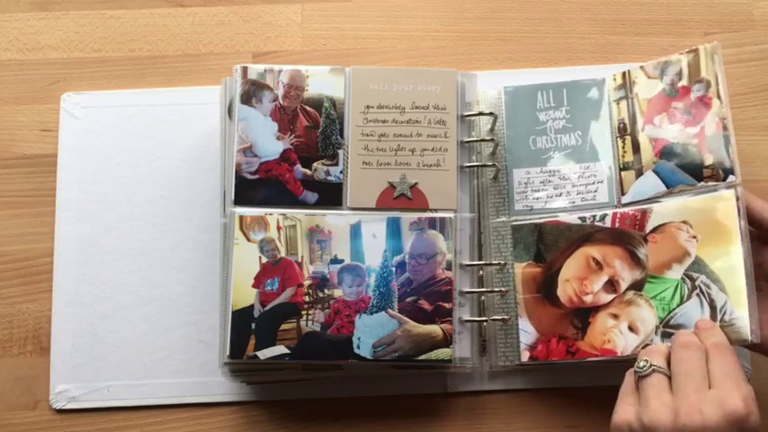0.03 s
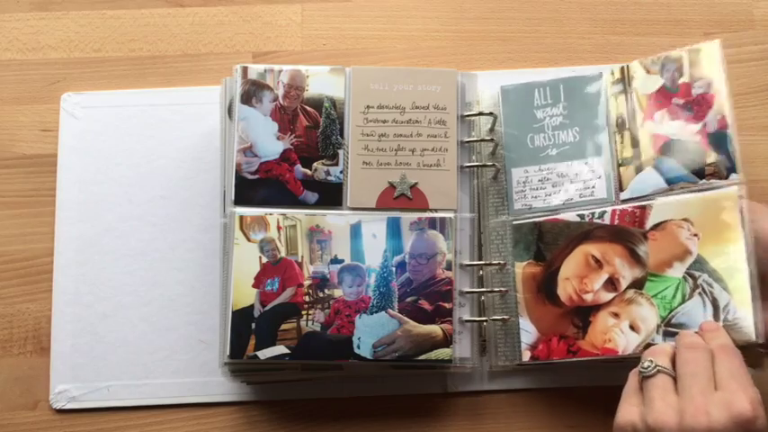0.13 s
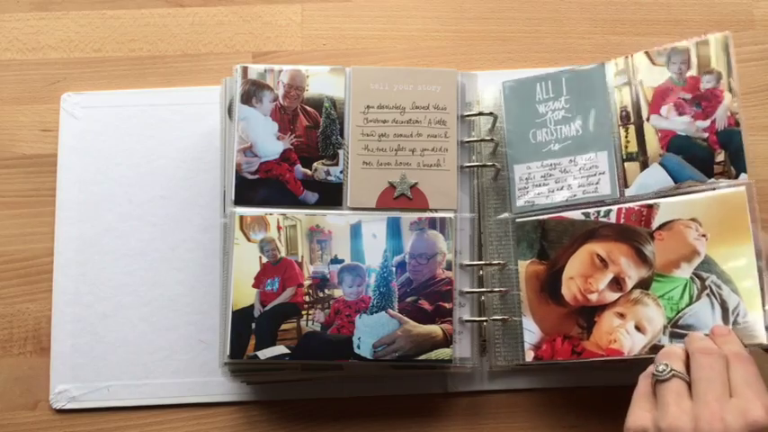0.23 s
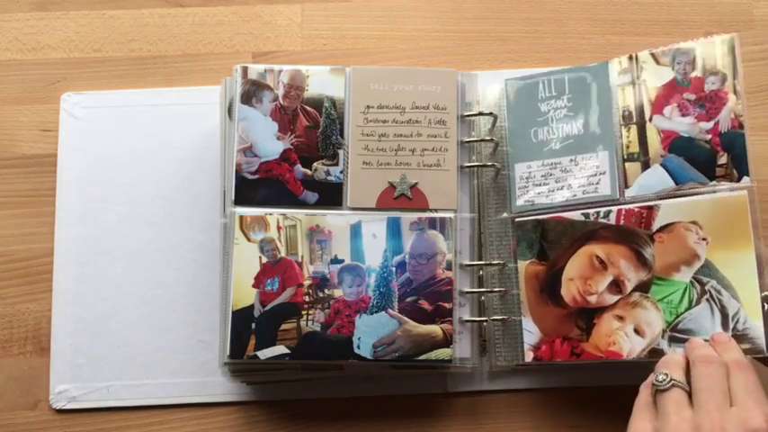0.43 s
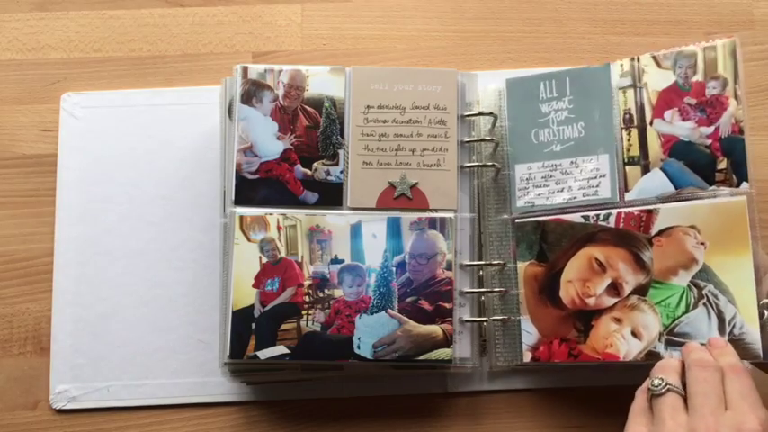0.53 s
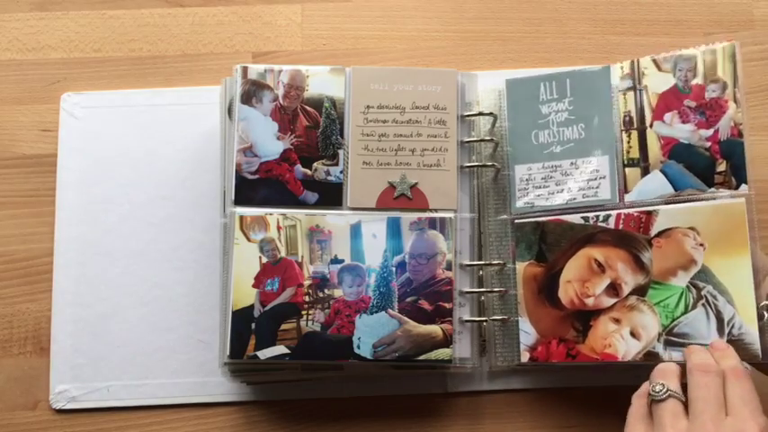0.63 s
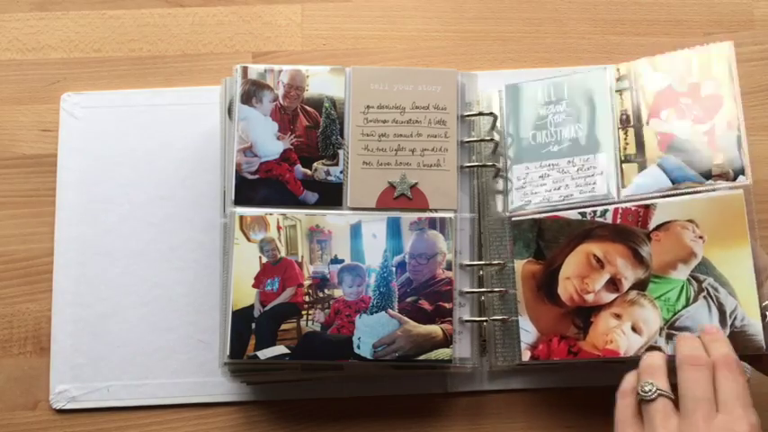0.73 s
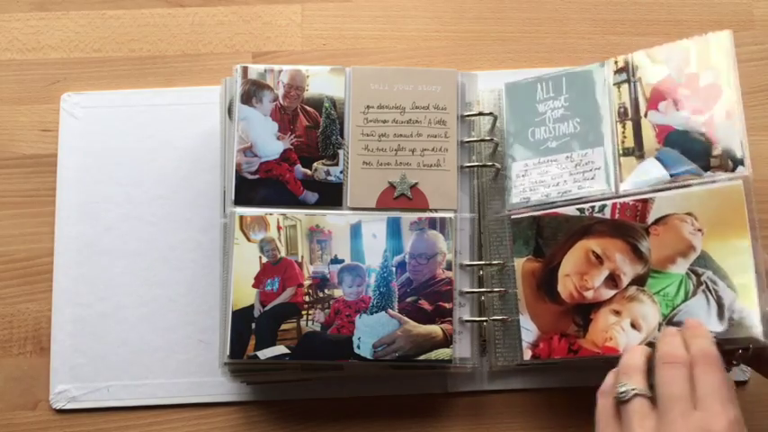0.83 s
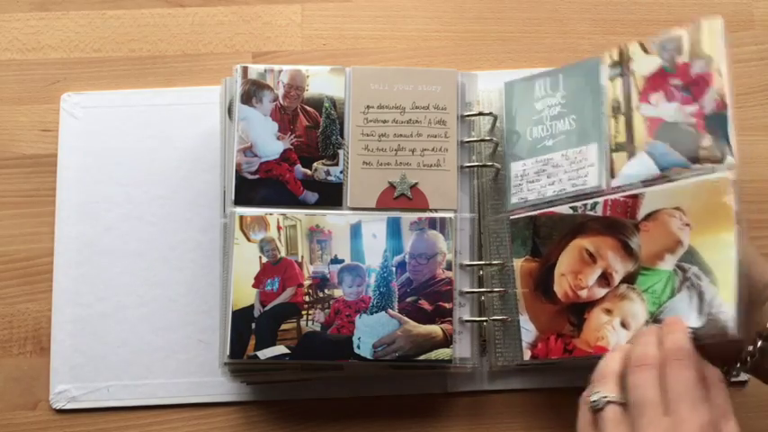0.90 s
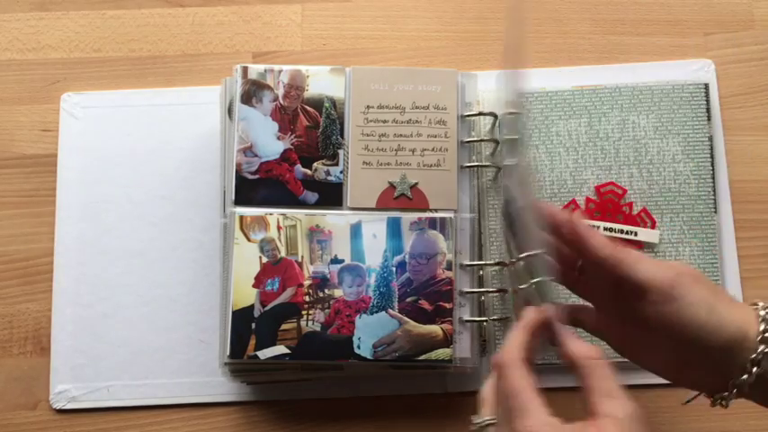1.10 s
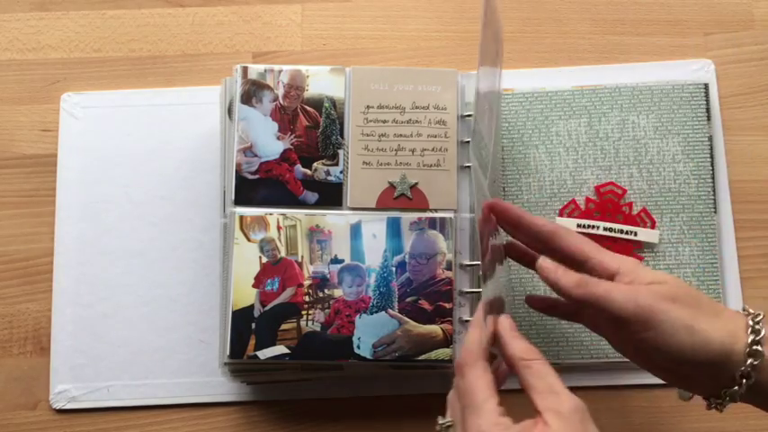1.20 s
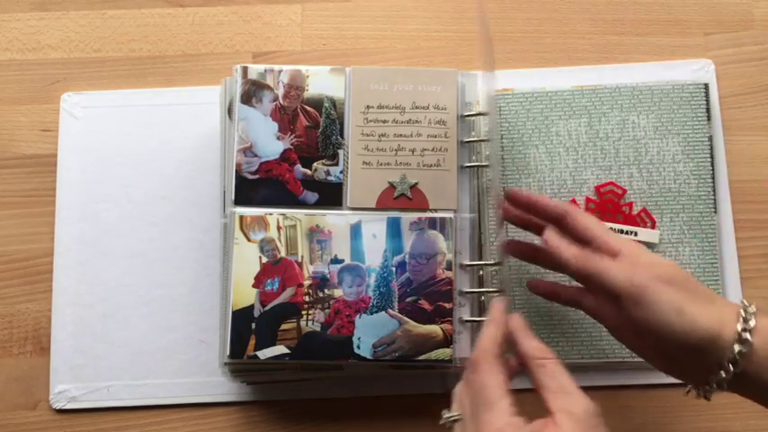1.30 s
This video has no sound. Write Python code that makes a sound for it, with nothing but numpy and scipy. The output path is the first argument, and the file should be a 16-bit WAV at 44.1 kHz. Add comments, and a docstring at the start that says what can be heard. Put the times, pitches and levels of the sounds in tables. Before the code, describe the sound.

Stiff plastic crackles and buckles with a sharp snap as an album page is handled on a table. Softer scattered ticks follow while the sheet turns over, above faint hum and microphone hiss indoors.

```python
"""A quiet room: a plastic page protector in a ring binder is lifted and turned on a table.
The stiff sheet buckles in single snaps, with faint crackle between them while it flexes.
Room and binder ring briefly after each snap; the binder shifts once with a soft knock.
Underneath are low mains hum, a faint buzz, room noise and microphone hiss."""
import sys
import numpy as np
from scipy import signal
from scipy.fft import rfft, irfft, next_fast_len
from scipy.io import wavfile

SR = 44100
rng = np.random.default_rng(int(sys.argv[2]) if len(sys.argv) > 2 else 0)


def unload_wav(signal):
    """Save mono or channel-first audio to the path in sys.argv[1] as 16-bit WAV at rate SR, clipped to [-1, 1]."""
    wavfile.write(
        sys.argv[1],
        SR,
        np.round(np.clip(np.atleast_2d(signal).T, -1, 1) * 32767).astype(np.int16),
    )


N = 59535


def amp(db):
    """Decibels to gain."""
    return 10 ** (np.asarray(db) / 20)


def unit(x):
    """Scale to rms 1."""
    return x / np.sqrt(np.mean(x ** 2) + 1e-20)


def colour(points, hz):
    """Gain at hz from (f/Hz, level/dB) points, log frequency axis."""
    f, db = np.transpose(points)
    return amp(np.interp(np.log(hz + 1), np.log(f + 1), db))


def filtered(x, response):
    """Apply the frequency response, a function of Hz."""
    size = next_fast_len(len(x) + SR // 4)
    return irfft(rfft(x, size) * response(np.fft.rfftfreq(size, 1 / SR)), size)[:len(x)]


def add(track, start_s, sound):
    """Mix sound into track at start_s."""
    start = max(round(start_s * SR), 0)
    part = track[start:start + len(sound)]
    part += sound[:len(part)]


def onset(t, delay_s=0.001538):
    """Linear fade-in centred on the first reflection's delay."""
    return np.clip(t / delay_s - .5, 0, 1)


def background(mains_hz=59.95, first_tick_s=.0072, air_db=-72.5, buzz_db=-80, hiss_db=-83.5):
    """Mains hum and ticking buzz over room noise and white microphone hiss."""
    hum_tones = [(59.3, -67.5), (119, -98.5), (140, -87)]  # hum partials: f/Hz, rms level/dB
    air_shape = [(20, -30), (50, -5), (100, -8.5), (150, -13), (230, -13.5), (320, -12.5), (500, -18.5),
                 (1050, -18.5), (1400, -26), (1750, -8.5), (2200, -31), (2750, -18), (3100, -10),
                 (3500, -24.5), (4200, -32), (7000, -33), (15000, -61)]  # room noise spectrum: f/Hz, relative level/dB
    buzz_shape = [(1500, -23.5), (2500, -6), (3100, 6), (4000, -17.5), (6500, -16), (9000, -15),
                  (15000, -33)]  # tick spectrum: f/Hz, relative level/dB
    t = np.arange(N) / SR
    hum = sum(amp(db) * np.sqrt(2) * np.sin(2 * np.pi * (hz * t + rng.random())) for hz, db in hum_tones)
    air = unit(filtered(rng.standard_normal(N), lambda hz: colour(air_shape, hz)))
    ticks = np.abs(np.cos(np.pi * mains_hz * (t - first_tick_s))) ** 40 * rng.standard_normal(N)
    buzz = unit(filtered(ticks, lambda hz: colour(buzz_shape, hz)))
    return hum + amp(air_db) * air + amp(buzz_db) * buzz + amp(hiss_db) * rng.standard_normal(N)


def buckle(patch_hz, thud_db, edge_db, crack_db, shiver_db, size=4096):
    """One snap: a kick and a brief shiver ring patch, page and sheet edge, under a rough crack."""
    thud_shape = [(40, -40), (130, -16.5), (230, -2.5), (300, -5), (440, -6.5), (640, 1), (850, 0),
                  (1100, 2.5), (2200, -5), (3600, -11.5), (5000, -46.5), (9000, -84)]  # whole-page response: f/Hz, level/dB
    edge_shape = [(900, -27), (2000, -15), (2550, -9), (2880, -3), (3180, 1), (3430, -7.5), (3800, -17),
                  (4500, -25.5), (9000, -73.5)]  # bright edge ring: f/Hz, level/dB
    crack_shape = [(2000, -10), (4400, -9), (5500, -1.5), (7000, -12), (8200, -21.5), (9700, -22.5),
                   (11500, -35.5), (15000, -42)]  # crack spectrum: f/Hz, level/dB
    patch_width_hz, patch_steepness = 1156, 2.277
    shiver_t60_s, crack_t60_s, bend_delay_s = 0.0383, 0.026, 0.00043
    hz = np.fft.rfftfreq(size, 1 / SR) + 1
    t = np.arange(size) / SR
    patch = (1 + ((hz - patch_hz ** 2 / hz) / patch_width_hz) ** 2) ** -patch_steepness
    thud = amp(thud_db) * colour(thud_shape, hz)
    edge = amp(edge_db) * colour(edge_shape, hz)
    # folded cepstrum gives a minimum-phase kick
    cepstrum = irfft(np.log(patch ** 2 + thud ** 2 + edge ** 2) / 2)
    cepstrum[1:size // 2] *= 2
    cepstrum[size // 2 + 1:] = 0
    kick = irfft(np.exp(rfft(cepstrum)))
    # all-pass: slow bending waves smear the attack
    lag = 1j * np.pi * hz * bend_delay_s / 2
    body = rfft(kick) * (1 - lag) / (1 + lag)
    shiver = rng.standard_normal(size) * amp(-60 * t / shiver_t60_s) * onset(t)
    crack = rng.standard_normal(size) * amp(-60 * t / crack_t60_s)
    spectrum = body * (1 + amp(shiver_db) * rfft(shiver / np.linalg.norm(shiver)))
    spectrum += amp(crack_db) * colour(crack_shape, hz) * rfft(crack / np.linalg.norm(crack))
    return irfft(spectrum)[:size // 2] / np.abs(irfft(body)).max()


def crackle(rate_per_s=420, centre_hz=1488.6, spread_db=2):
    """Many tiny buckles at random, as strong as the sheet is flexed."""
    flex = [(0, -66), (.125, -76), (0.148, -57.5), (0.201, -54), (.235, -48.5), (.27, -45.5), (.32, -58.5),
            (.5, -80.5), (.65, -78.5), (.76, -78.5), (.81, -69), (0.921, -70.5), (.95, -90), (1.1, -77),
            (1.2, -77.5), (1.35, -74)]  # crackle envelope: t/s, rms level/dB
    kinds = [buckle(centre_hz * 2 ** octaves, thud_db=-8.5, edge_db=3 + 10 * bright,
                    crack_db=-18, shiver_db=-4.5)
             for octaves, bright in rng.random((40, 2)) - .5]
    track = np.zeros(N)
    for when, weakness, pick in rng.random((int(rate_per_s * N / SR), 3)):
        gain = amp(-spread_db * np.log(weakness + 0.013))
        add(track, when * N / SR, gain * kinds[int(pick * len(kinds))])
    return unit(track) * amp(np.interp(np.arange(N) / SR, *np.transpose(flex)))


def snaps():
    """The distinct buckles of the stiff sheet."""
    # buckles: t/s, level/dB, patch f/Hz, then relative thud/dB, edge/dB, crack/dB, shiver/dB
    buckles = [(0.0248, -29.5, 3188, -23.5, -3, -30.5, -22.5), (.1320, -31, 1386, -7, -2.5, -24.5, -4),
               (0.146, -25, 1400, -20.5, -6.5, -32.5, -14.5), (.1650, -35.5, 1683, -13, -5, -30, -9),
               (0.1837, -38.5, 1395, -10, 7, -15.5, 1.5), (0.1916, -39.5, 3085, -9.5, 16.5, -20, -0.5),
               (0.2093, -20.5, 1740, -26, -12, -58, -31), (.2235, -30.5, 1260, -7.5, -13.5, -39.5, -9),
               (.2270, -28.5, 1554, -15, -21.5, -29.5, -7), (.2357, -11, 1623, -11.5, -9.5, -25.5, -17),
               (.2390, -12, 1642, -16.5, -5.5, -22, -9.5), (0.2428, -25.5, 1436, -16.5, 0.5, -17.5, 6.5),
               (0.2469, -21.5, 1303, -11.5, -9.5, -29.5, -4), (.2520, -27.5, 1120, -8.5, 1, -35, 2.5),
               (0.5648, -39, 1434, 3, 0.5, -23, -3.5), (.6545, -47.5, 1690, -6.5, -0.5, -28, 4.5),
               (0.683, -35.5, 1507, -5, -2.5, -17, -3), (.7040, -55, 1920, -11.5, 0, -4, 0.5),
               (0.771, -56.5, 1833, -8.5, -11, -23, 2), (0.7934, -49.5, 1780, -25, 1.5, -26.5, -5.5),
               (0.8105, -50.5, 1696, -21, -5, -19.5, -7.5), (0.8332, -52.5, 1092, -5, -4, -37, -13.5),
               (0.8554, -45, 1616, -7.5, -23, -40.5, -7), (0.9003, -42.5, 1300, -3, 8.5, -22.5, -7),
               (0.9711, -56.5, 1343, -12, -5.5, -25.5, -10.5), (1.0629, -61, 2996, -11, 5.5, 0.5, -1),
               (1.2114, -51.5, 1065, -2.5, -12.5, -28.5, 1.5),
               (1.226, -60.5, 2913, -14.5, -16.5, -36.5, -12), (1.2587, -37.5, 1058, -26.5, 8, -24, -5),
               (1.2665, -49.5, 984, -21, -0.5, -27.5, -4.5), (1.27, -46.5, 1713, -24.5, -1.5, -36, -1),
               (1.2800, -52, 936, -20, -4, -28.5, -5.5)]
    track = np.zeros(N)
    for start_s, db, *timbre in buckles:
        add(track, start_s, amp(db) * buckle(*timbre))
    return track


def room(sheet, early_db=-13, early_t60_s=.05, tail_db=-9.5, tail_t60_s=0.365, ring_db=-58):
    """Quick reflections off table and binder, a diffuse tail and a few lasting resonances."""
    tail_shape = [(100, 9), (250, 6.5), (500, 9), (1100, 3.5), (1800, -4.5), (3100, -0.5), (5500, 1),
                  (12000, 0.5)]  # reverb spectrum: f/Hz, relative level/dB
    modes = [(234.5, -5, 0.607), (284.6, 1.5, 0.12), (578, -9, 0.51), (682, 1.5, 0.14), (1115.6, 2, 0.5),
             (1227.2, -6.5, 0.48), (1323.4, -0.5, 0.13), (1581.9, -1, 0.18), (1795, -6, 0.317),
             (2902, -8, 0.49), (2997, -9.5, 0.62), (3140, -13, 0.43)]  # binder and room resonances: f/Hz, relative level/dB, t60/s
    t = np.arange(SR // 2) / SR
    early = rng.standard_normal(len(t)) * onset(t) * amp(-60 * t / early_t60_s)
    tail = filtered(rng.standard_normal(len(t)), lambda hz: colour(tail_shape, hz))
    tail *= onset(t) * amp(-60 * t / tail_t60_s)
    ring = sum(amp(db - 60 * t / t60_s) * np.sin(2 * np.pi * (hz * t + rng.random()))
               for hz, db, t60_s in modes)
    response = amp(early_db) * early / np.linalg.norm(early)
    response += amp(tail_db) * tail / np.linalg.norm(tail)
    response += amp(ring_db) * onset(t) * ring
    return signal.fftconvolve(sheet, response)[:N]


def binder_bump(start_s=.86, hz=108.3, level_db=-62, t60_s=0.098):
    """One soft, low knock: the binder shifts on the table as the page lifts."""
    t = np.maximum(np.arange(N) / SR - start_s, 0)
    return amp(level_db - 60 * t / t60_s) * np.sin(2 * np.pi * hz * t)


def scene():
    """Sheet and binder in the room, mono."""
    steady = background()
    sheet = snaps() + crackle()
    return (sheet + room(sheet) + binder_bump() + steady)[None]


def record(dry):
    """Brick-wall low-pass."""
    top_hz = 15700
    return np.array([filtered(channel, lambda hz: hz < top_hz) for channel in dry])


dry = scene()
out = record(dry)
unload_wav(out)
```